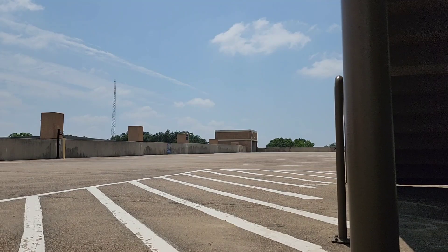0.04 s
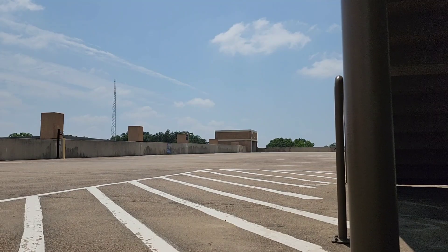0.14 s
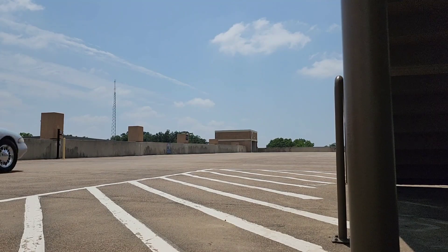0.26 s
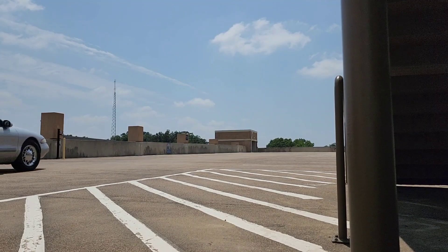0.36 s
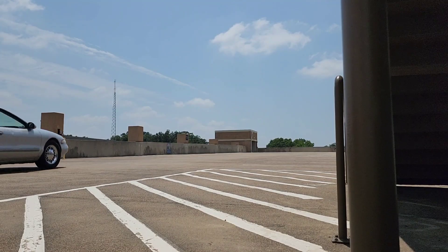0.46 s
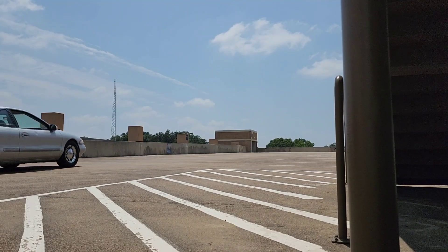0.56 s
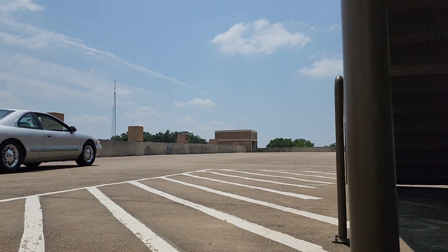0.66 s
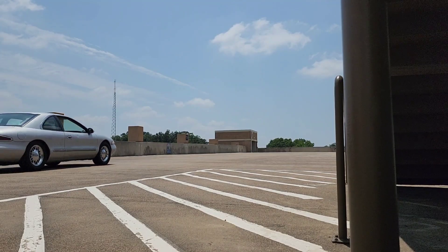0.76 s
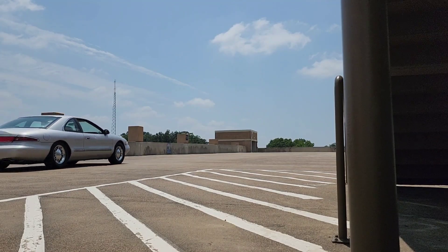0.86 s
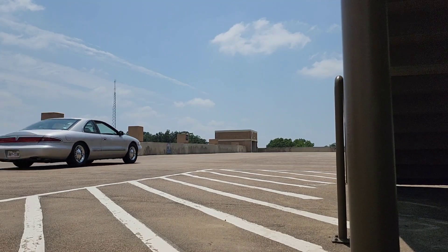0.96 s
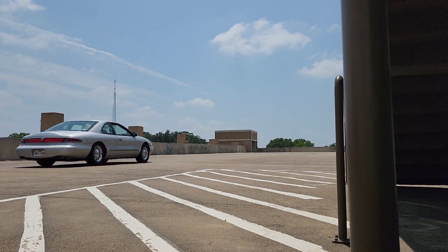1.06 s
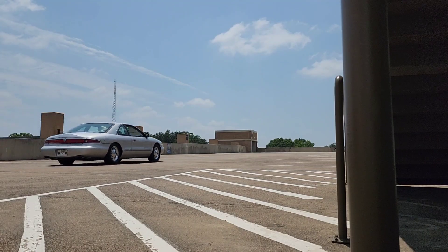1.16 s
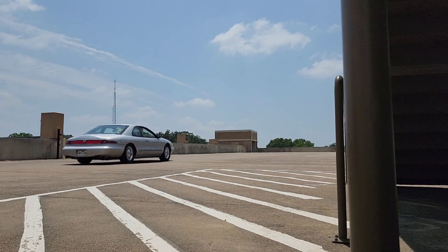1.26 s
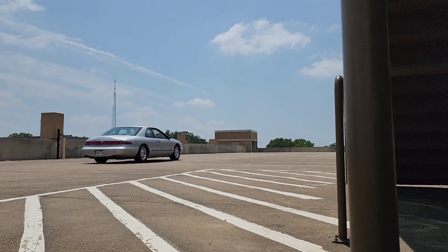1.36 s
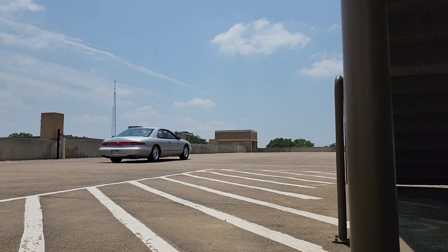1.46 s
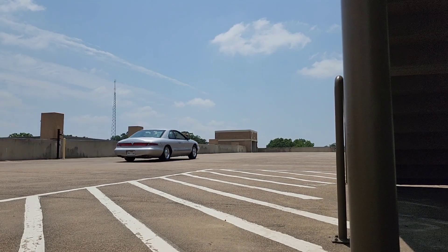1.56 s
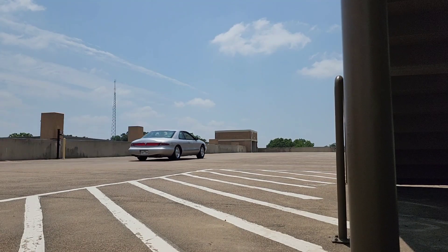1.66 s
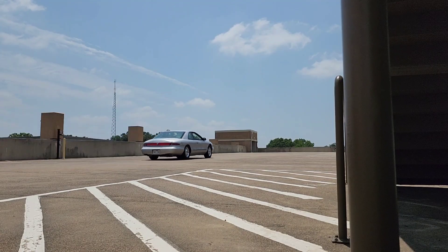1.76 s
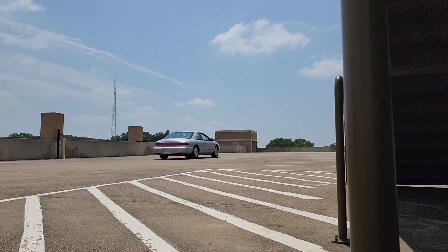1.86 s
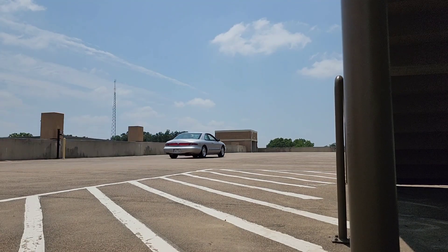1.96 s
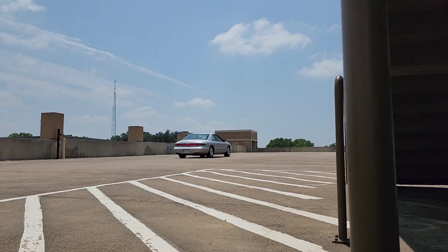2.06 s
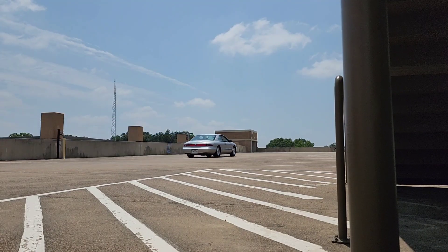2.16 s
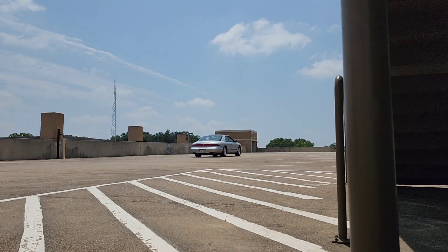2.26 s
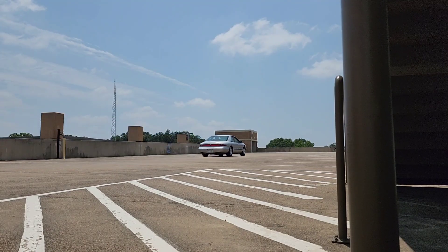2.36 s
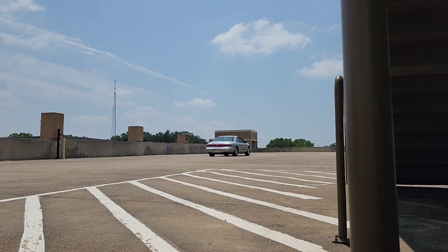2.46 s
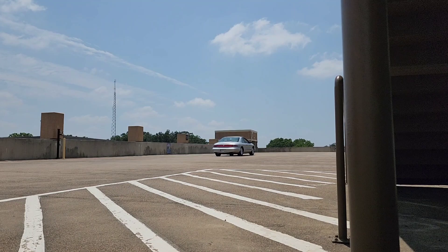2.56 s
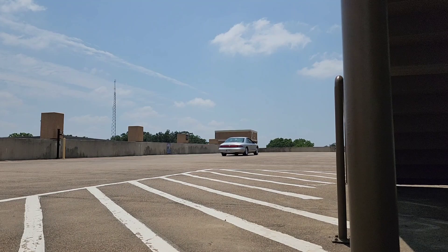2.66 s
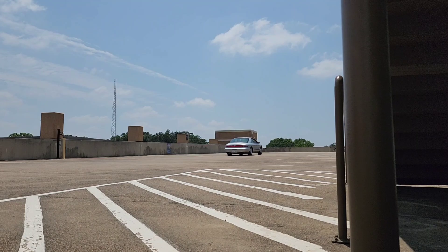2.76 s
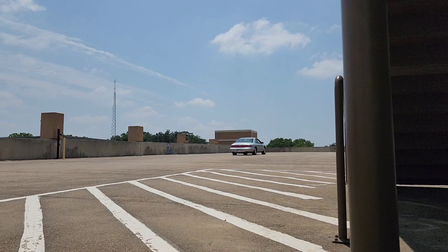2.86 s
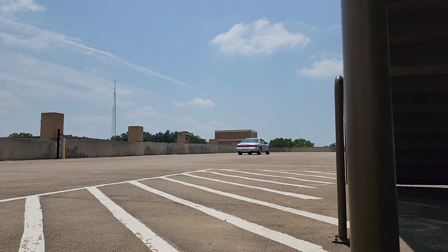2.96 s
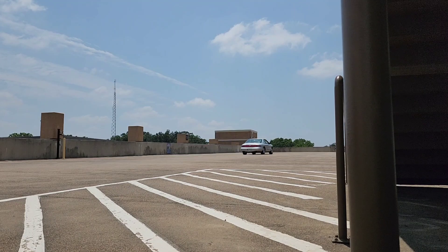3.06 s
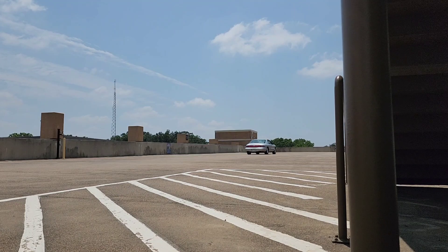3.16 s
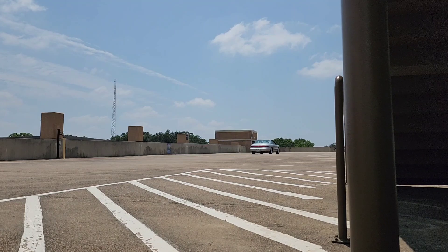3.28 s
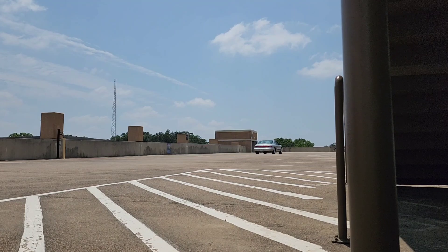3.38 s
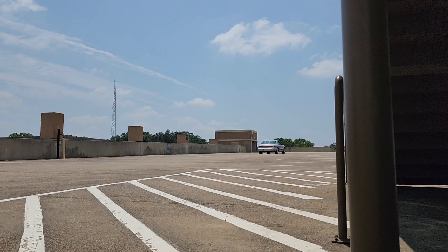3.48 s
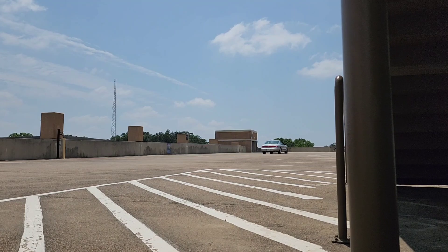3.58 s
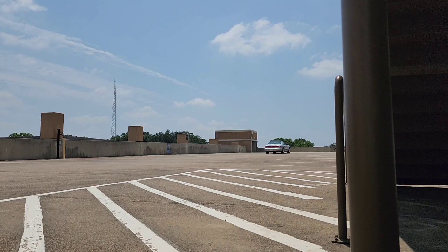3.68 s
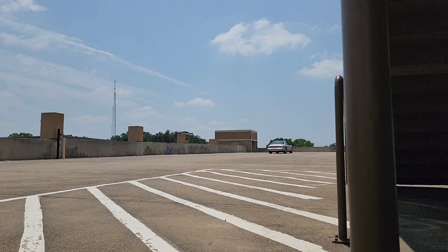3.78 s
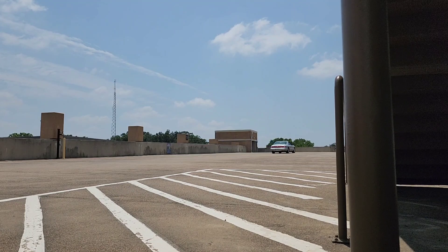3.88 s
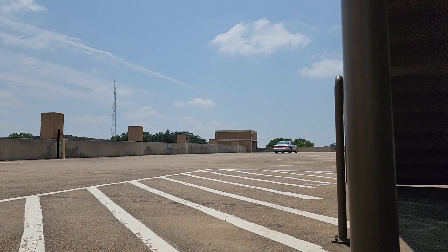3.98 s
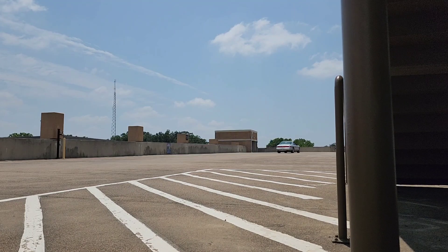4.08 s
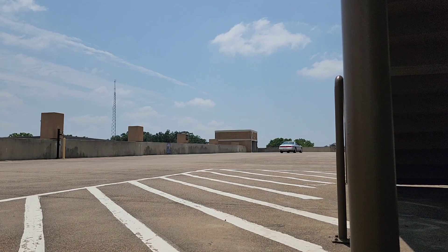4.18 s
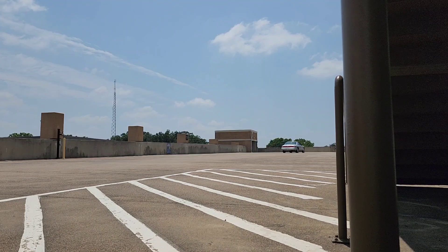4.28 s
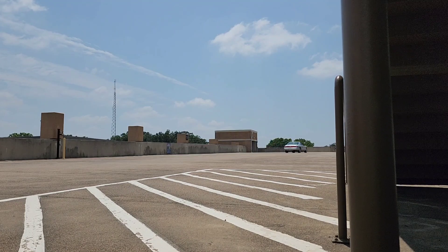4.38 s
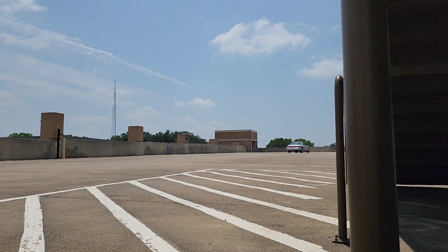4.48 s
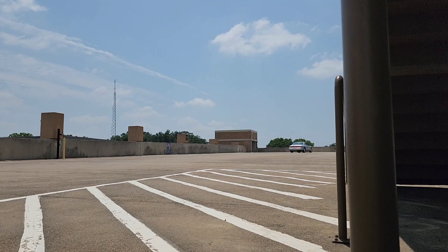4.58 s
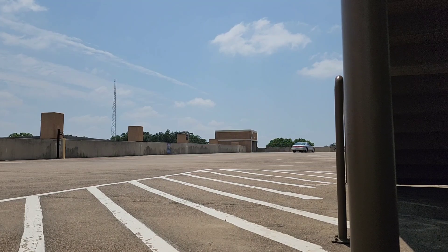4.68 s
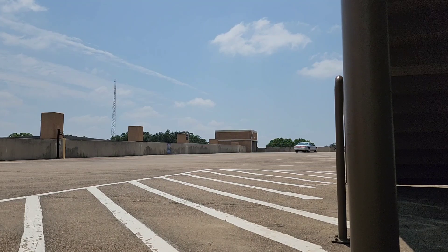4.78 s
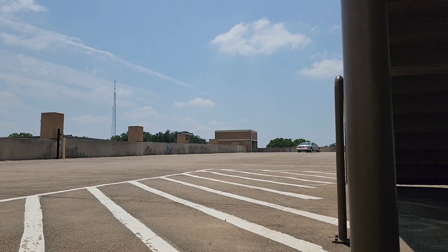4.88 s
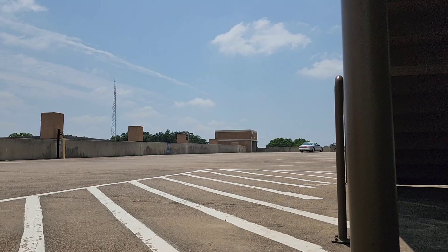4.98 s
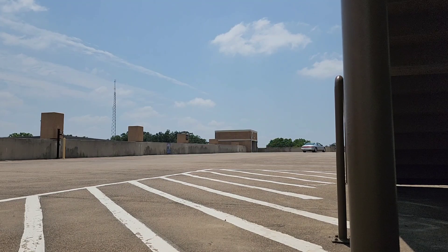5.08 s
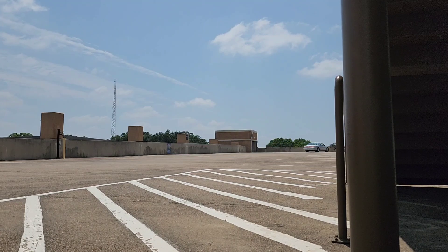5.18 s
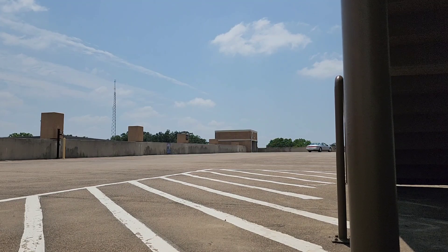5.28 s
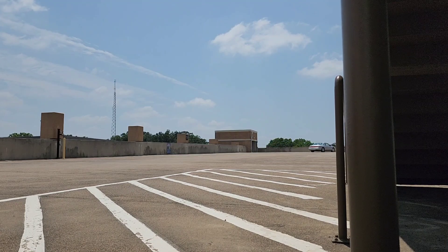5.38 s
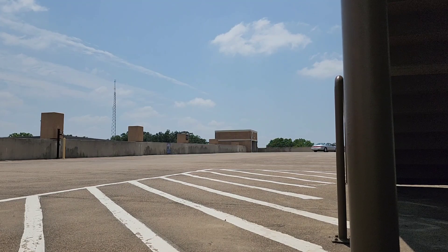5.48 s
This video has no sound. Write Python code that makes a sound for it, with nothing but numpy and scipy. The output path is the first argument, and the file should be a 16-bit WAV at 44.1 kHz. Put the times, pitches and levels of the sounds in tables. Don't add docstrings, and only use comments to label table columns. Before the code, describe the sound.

Outdoors on an open rooftop car park, a large eight-cylinder car accelerates close by, its deep exhaust drone rising with rough barks. At about two seconds the throttle lifts, pitch sinks and the car coasts into the distance. Tyres hiss and low walls echo. Stationary stereo microphones catch wind rumble and buffets, with town hum beneath and a tiny bird at the end.

```python
import sys
import numpy as np
from scipy import signal
from scipy.fft import rfft, irfft, next_fast_len
from scipy.io import wavfile
from scipy.ndimage import uniform_filter1d, map_coordinates

SR = 44100
rng = np.random.default_rng(int(sys.argv[2]) if len(sys.argv) > 2 else 0)


def invert_db(x):
    u = np.asarray(x, float) / 20
    return 10 ** u


def unload_audio(sound):
    columns = np.transpose(np.atleast_2d(sound))
    steps = np.round(np.clip(columns, -1, 1) * 32767)
    wavfile.write(sys.argv[1], SR, steps.astype(np.int16))


N = 243851
TIME = np.arange(N) / SR

# time_s, firing_rate_hz, exhaust_level_db
ENGINE_SPEED = [(0, 135.8, -26.5), (.2, 137.9, -23), (.35, 142, -28), (.6, 152.7, -25.5),
                (.9, 164.7, -23.5), (1.22, 176.5, -19.5), (1.4, 181.3, -23.5), (1.68, 188.9, -25),
                (1.92, 191.7, -25), (2.1, 179.8, -26), (2.3, 173.8, -22.5), (2.6, 154.9, -28),
                (3.0, 146.8, -28.5), (3.15, 133, -34.5), (3.4, 124.1, -37), (3.85, 112.9, -44),
                (4.25, 107.4, -44), (5.53, 100.7, -60.5)]
# time_s, share_off (0-1)
THROTTLE_OFF = [
    (0, 0.03),
    (2, 0.39),
    (2.5, 0.67),
    (5.53, 0.98),
]
# time_s, factor
RAGGEDNESS = [(0, 1.5), (.5, .75), (1.9, .75), (2.4, 1.7), (3.5, 2.5), (5.53, 4)]
FIRINGS_SIDE_ON = [3, 1, -1, -3.5, 3, -1, -1, -2]
FIRINGS_TAIL_ON = [3, 1, -2, -4, -3.5, 3, 1, -1]
# time_s, share_tail_on (0-1)
TURNING = [(0, 0), (.98, 0), (1.08, 1), (5.53, 1)]
# order, best_firing_rate_hz,
# width_hz, level_db, coasting_loss_db
PIPE_ORDERS = [(8, 125.3, 17.3, 8, 3), (8, 168.4, 13.8, 2.5, 12), (8, 185, 9.4, 1.5, -0.5),
               (16, 177.3, 15.8, -4.5, 5), (24, 161, 5, -7, 18), (24, 181, 3.3, -9.5, 4),
               (32, 162.2, 11.6, -1, 28.5), (32, 178, 8.3, -7.5, 4), (4, 182.7, 19, 6, 64),
               (5, 160, 14, -3, 33), (11, 189, 4.8, -10.5, -6.5), (11, 141.7, 8.6, -6, 18),
               (28, 172, 6.9, -7, 17), (46, 173, 4, -10.5, 25), (36, 175, 3.7, -8.5, 9.5),
               (41, 190, 11, -13.5, 25.5), (17, 137.8, 10.7, -22.5, -21.5), (13, 167.4, 6.2, -10, 13),
               (22, 149.7, 4.3, -19, -20.5), (20, 156, 10, -14, 10.5), (26, 240, 9.2, -14, 30.5),
               (30, 171, 3.6, -8.5, 20), (34, 189.6, 4.7, -5, 17), (38, 169, 7.7, -2, 24.5),
               (24, 140, 4.5, -14.5, 27), (40, 140, 2.3, -18.5, 14.5), (24, 190, 5.4, -15, 2.5),
               (21, 161, 4.7, -18, -19.5), (22, 190, 2.3, -16, 21), (34, 150, 6.8, -14, 24),
               (42, 180, 4.4, -6.5, 19), (19, 190, 4.8, -14.5, 2), (16, 162.2, 11, -12.5, 18.5),
               (16, 110, 4.05, -32.5, -24), (44, 175, 2.8, -8.5, 26), (20, 184, 7.4, -13, 4),
               (26, 140, 3.1, -17, 23), (14, 146.3, 8.9, -20.5, -16),
               (40, 120, 5.8, -5, 17), (37, 190, 6, -10, 15), (29, 140, 8.1, -6, 17),
                 (31, 178, 4.7, -9, 35), (35, 180, 3.6, -9.5, 15), (27, 180, 4.7, -12, 7.3),
                 (23, 173, 6.4, -14, 8.5), (9, 154, 20, -12, 3.7), (12, 172.6, 11, -11.5, 18)]
# time_s, half_length_s, level_db
TONE_FADES = [(0.14, 0.011, -36), (0.188, 0.017, -9), (0.206, 0.01, 10), (0.31, 0.045, -16),
              (0.62, 0.06, -6), (0.926, 0.0074, -3), (1.013, 0.16, -2.5), (1.41, 0.037, 3.5),
              (1.59, 0.1, 5), (1.88, 0.083, -1), (2.163, 0.041, -3), (2.241, 0.028, -11),
              (2.374, 0.051, -12), (2.639, 0.042, -5), (2.828, 0.077, -11), (2.991, 0.012, -16),
              (3.09, 0.051, -20), (3.253, 0.021, 4), (3.328, 0.026, -29), (3.56, 0.1, -8), (3.73, 0.072, 1)]
# order, time_s, half_length_s, level_db
OVERTONE_FLARES = [(16, 0.583, 0.024, 11.5), (16, 1.08, 0.12, -4), (16, 1.4, 0.025, 4),
                   (16, 1.4, 0.019, 1.5), (16, 1.417, 0.05, 2.5), (16, 1.534, 0.048, -18),
                   (16, 2.3, 0.021, 3), (16, 2.186, 0.056, -22), (16, 2.41, 0.073, 9), (16, 2.48, 0.1, -3),
                   (24, 1.7, 0.023, 1), (24, 3.5, 0.031, -9), (32, 1.32, 0.026, -14), (32, 2.7, 0.021, 4.5),
                   (32, 1.3, 0.083, -6.5), (32, 2.28, 0.086, -0.5), (16, 4.1, 0.053, 11),
                   (16, 4.28, 0.025, 4), (16, 8.1, .03, 9)]
PORT_SPLIT = [(4, .2), (8, 0), (16, 0.13), (24, 0.28), (32, 0.073), (46, 0)]
# pitch_hz, width_hz, pulling_level_db, coasting_level_db
TAIL_PIPE = [(139.3, 22, 6, -5), (227, 115, 1.5, 11.5), (394, 84, -4, 10), (585, 132, 3, 3.5),
             (700, 50, 4, -7), (780, 21, -14.5, -12), (1040, 170, -39.5, -26)]
# time_s, peak_level_db, ring_hz
HARD_FIRINGS = [(0.067, -23, 554), (0.104, -20, 700), (0.166, -23, 656), (0.216, -24, 694),
                (0.237, -25, 670), (0.341, -8, 704), (0.45, -12, 620), (0.506, -10.5, 650),
                (0.647, -14, 759), (0.748, -9, 479), (0.798, -22, 735), (0.822, -16, 620),
                (0.848, -18, 710), (0.872, -12, 654), (0.921, -17, 656), (0.945, -22, 690),
                (0.969, -17, 696), (1.138, -21, 670), (1.157, -15.5, 730), (1.185, -9, 670),
                (1.23, -16, 720), (1.487, -14, 620), (1.695, -15.5, 780), (1.837, -20, 563.9),
                (1.904, -9.5, 573), (2.005, -20.5, 713), (2.069, -26, 740), (2.137, -7, 733),
                (2.181, -30.5, 710), (2.227, -16, 770), (2.245, -11, 700), (2.273, -14, 673),
                (2.366, -27.5, 713), (2.494, -26, 630.7), (2.615, -24, 540), (2.638, -21.5, 743),
                (2.707, -19, 670), (2.768, -32, 780), (2.854, -12, 732), (2.873, -27, 697),
                (2.927, -31, 459.5), (2.972, -28, 660), (3.001, -20, 764), (3.059, -31, 582.2),
                (3.092, -28, 743), (3.114, -22, 641), (3.153, -15, 670), (3.176, -28, 750),
                (3.239, -28, 664), (3.304, -15, 710), (3.371, -29, 740), (3.396, -21, 665),
                (3.47, -23, 514), (3.572, -21, 519.6)]
CREST, VALVE = .33, .15

# time_s, distance_m
CAR_DISTANCE = [(0, 6.9), (.5, 7), (1.1, 6.8), (1.7, 10.6), (2.4, 11.9), (2.8, 23), (3.6, 31.5), (5.53, 67)]
# pitch_hz, level_db_per_hz
WHIRR_TONE = [(530, -45.5), (900, -1.5), (982, -5.5), (1070, -4.5), (1170, -11.5), (1340, -6.5),
              (1660, -10), (1830, -8.5), (2050, -11), (2220, -16), (2410, -11.5), (2680, -16),
              (3280, -21.5), (3650, -21.5), (4500, -27.5), (5850, -55.5), (9900, -120)]
# pitch_hz, level_db_per_hz
HISS_TONE = [(2060, -13.5), (3500, -2), (5010, -5.5), (6240, -4.5), (6940, -5.5), (8220, -6), (9930, -17),
             (12100, -17), (14300, -17.5), (14900, -14), (15700, -39.5)]
# pitch_hz, share
CAR_LIKENESS = [(900, 0.83), (2000, 0.31), (4000, 0.14), (9000, 0.078)]
# time_s, half_length_s, level_db
TYRE_SCRUB = [
    (0.212, 0.06, -39.5),
    (0.417, 0.085, -45),
    (1.207, 0.36, -46),
]
# pitch_hz, level_db_per_hz
TREAD_TONE = [(1000, -120), (1600, -49), (1800, 0), (1920, -13), (2060, -5), (2300, -44), (3500, -120)]
# time_s, half_length_s, level_db
TYRE_ROAR = [
    (2.875, 0.24, -46.5),
    (3.6, 0.38, -51.5),
    (4.2, 0.34, -53.5),
]
# pitch_hz, level_db_per_hz
ROAR_TONE = [(300, -40), (550, -4), (800, 1), (1200, -4), (1600, -15.5), (2200, -30), (4000, -79)]
# time_s, level_db, low_hz, high_hz
STONES = [
    (.3365, -26, 4200, 6800),
    (.847, -37, 2900, 14400),
    (.859, -39, 2900, 14400),
]
# time_s, half_length_s, level_db
BODY_BOOMS = [
    (0.7, 0.26, -24.5),
    (1.14, 0.13, -29),
    (1.617, 0.17, -34.5),
]
# pitch_hz, level_db_per_hz
BODY_TONE = [(20, -88.5), (45, -38), (70, 2), (92, -0.5), (110, -1), (150, -32), (250, -120)]

# time_s, exhaust_lag_samples (right after left), gear_lag_samples, wall_echo_db
CAR_BEARING = [(0, 21, 15, -25.5), (.5, 13.5, 12.4, -15), (1.3, 8.5, 12.8, -8.5), (1.9, 8, 13.7, -8),
               (3, -12.5, 12.3, -11.5), (5.53, -9, 10.6, -19)]
# pitch_hz, level_db
ECHO_TONE = [(100, 3), (250, -7), (450, -3.5), (900, 0.5), (2000, 18.5), (8000, -21)]
# pitch_hz, decay_s
ECHO_DECAY = [(200, 0.82), (1000, 0.9), (8000, 0.33)]
# pitch_hz, level_db
STEREO_LEAN = [(100, -1), (700, 1.5), (1400, -1.5), (5000, -1), (9000, -7.5), (15000, -5.5)]

# time_s, half_length_s, level_db, left_right_db
WIND_GUSTS = [(.05, 0.07, -31, 3), (.23, 0.052, -22.5, 5), (.35, 0.053, -28, 5), (.96, 0.018, -31, 2),
              (1.21, 0.094, -22, 1), (1.62, 0.016, -35, -6), (2.85, 0.21, -41.5, -2),
              (3.14, 0.016, -29, -3), (4.02, 0.074, -43, -2), (4.3, 0.19, -52, 2), (5.26, 0.018, -38, 2),
              (5.42, 0.076, -46, -1)]
# time_s, half_length_s, level_db, left_right_db
WIND_BUFFETS = [
    (0.2, 0.044, -25, -16),
    (1.16, 0.021, -18.5, 3),
    (1.2, .02, -25, 4),
    (1.24, 0.034, -18.5, 5.5),
]
# time_s, half_length_s, level_db
WIND_LULLS = [
    (0.433, 0.033, -18.5),
    (2.08, 0.13, -12),
    (3.283, 0.091, -9),
]
# pitch_hz, level_db_per_hz
RUMBLE_TONE = [(12, -27), (20, -9.5), (70, -9), (91, -14), (108, -18.5), (130, -21.5), (170, -54),
               (290, -120)]
# pitch_hz, level_db_per_hz
BUFFET_TONE = [(20, -6), (45, -20), (120, 13), (250, -0.5), (700, -9), (1500, -23), (4000, -120)]
# start_s, length_s, start_hz, end_hz, level_db
BIRD_NOTES = [(5.084, 0.0073, 6580, 6100, -58), (5.086, .01, 6100, 5130, -63),
              (5.136, 0.015, 6540, 5190, -53), (5.15, 0.0071, 5100, 4530, -66),
              (5.206, 0.015, 5750, 5350, -65), (5.25, .01, 4630, 4300, -72),
              (5.302, 0.025, 5790, 5250, -67), (5.317, 0.014, 4800, 4580, -67),
              (5.349, 0.012, 5620, 6050, -62), (5.361, 0.016, 5750, 5300, -65),
              (5.372, .01, 5250, 4670, -67), (5.455, .012, 8000, 7200, -71),
              (5.465, 0.012, 6600, 5970, -71)]
# pitch_hz, level_db_per_hz
TOWN_TONE = [(53, -35), (90, 5.5), (134, -9.5), (172, -7), (343, -16.5), (393, -20.5), (432, -18.5),
             (554, -22.5), (860, -24.5), (1780, -28.5), (2200, -39), (4370, -39.5), (8700, -59.5),
             (11300, -81), (19100, -120)]
# pitch_hz, share
TOWN_LIKENESS = [(60, 1), (180, 1), (550, 1), (1650, 0.41), (4970, 0), (15000, 0.33)]
# pitch_hz, level_db_per_hz
INSECT_TONE = [(3700, -33), (4200, 1.0), (4400, -3.5), (4650, -12), (5200, -42.5), (8600, -39.0), (9100, -99)]
# pitch_hz, level_db_per_hz
CIRCUIT_TONE = [(10000, -36), (10600, -1.5), (14700, -3.0), (15600, -1), (16000, -38.5)]


def unit(x):
    return x / np.sqrt(np.mean(x ** 2) + 1e-20)


def along(points, hz):
    f, v = np.transpose(points)
    return np.interp(np.log(hz + 1), np.log(f + 1), v)


def curves(rows):
    s, *cols = np.transpose(rows)
    return [np.interp(TIME, s, c) for c in cols]


def wobble(rate):
    coarse = TIME[::64]
    knots = rng.standard_normal(int(N * rate / SR) + 4)
    return np.interp(TIME, coarse, map_coordinates(knots, [coarse * rate]))


def bump(s, half):
    return np.exp(-np.square(np.square((TIME - s) / half)))


def swelling(rows):
    return sum(invert_db(db) * bump(s, half) for s, half, db in rows)


def filtered(x, response):
    m = next_fast_len(N + 8192)
    return irfft(rfft(x, m) * response(np.fft.rfftfreq(m, 1 / SR)), m)[..., :N]


def rush(spectrum, alike):
    def shape(hz):
        turn = np.arccos(np.clip(along(alike, hz), -1, 1)) / 2
        return invert_db(along(spectrum, hz)) * [np.cos(turn), np.sin(turn)]

    mid, side = filtered(rng.standard_normal((2, N)), shape)
    return unit(np.array([mid + side, mid - side]))


def engine():
    rate, exhaust_db = curves(ENGINE_SPEED)
    rate = uniform_filter1d(rate, int(.1 * SR), mode="nearest")
    fired = np.cumsum(rate) / SR
    (lift,), (rough,), (tail_on,) = curves(THROTTLE_OFF), curves(RAGGEDNESS), curves(TURNING)
    hard = crests(fired)
    surge = surges(hard)
    drone = exhaust_drone(rate, fired, lift, rough, tail_on, surge) * invert_db(exhaust_db + 0.5)
    bark = exhaust_bark(fired, lift, rough, tail_on) * invert_db(exhaust_db - 4.5 + 1.2 * wobble(18))
    return drone, surge * bark + pops(hard)


def exhaust_drone(rate, fired, lift, rough, tail_on, surge):
    rings = PIPE_ORDERS
    fading = invert_db(sum(db * bump(s, half) for s, half, db in TONE_FADES))
    alive = np.clip((4.05 - TIME) / 0.09, 0, 1)

    def ring(order):
        level = 0
        for n, best_hz, width_hz, db, lost_db in rings:
            if round(n) == order:
                nearness = np.exp(-((rate - best_hz) / width_hz) ** 2)
                level = level + invert_db(db - lost_db * lift) * (invert_db(-16.5) + nearness)
        return level

    def flare(order):
        return invert_db(sum(db * bump(s, half) for n, s, half, db in OVERTONE_FLARES if round(n) == order))

    def tone(k):
        side_on, behind = firing_order(FIRINGS_SIDE_ON, k), firing_order(FIRINGS_TAIL_ON, k)
        start = np.angle(side_on) + tail_on * np.angle(behind / side_on)
        blur = .12 * k ** 1.4 * rough ** 2 * wobble(24)
        apart = (along(PORT_SPLIT, 8 * k) + .03 * k * wobble(4)) * [[1], [-1]]
        flutter = invert_db((1.2 + .3 * k) * wobble(14) + 1.3 * wobble(35))
        return flutter * np.cos(2 * np.pi * k * fired + blur + start + apart)

    drone = 0
    for n in sorted({round(row[0]) for row in rings}):
        if n == 8:
            change = fading * alive
        else:
            change = flare(n) * (surge if n > 20 else 1)
        drone = drone + ring(n) * tone(n / 8) * change
    return drone


def firing_order(pattern, k):
    linger = .045 * max(k - 2, 0) ** 2
    return invert_db(pattern) @ np.exp(-2j * np.pi * k * (np.arange(8) + CREST) - 2j * np.pi * linger)


def exhaust_bark(fired, lift, rough, tail_on):
    at = np.flatnonzero(np.diff(np.floor(fired - VALVE)) > 0)
    cylinder = np.arange(len(at)) % 8
    drift = np.array([wobble(2) for _ in range(8)])[cylinder, at]
    chance = rng.standard_normal((len(at), 2))
    shift = np.round(3 * rough[at] * chance[:, 0] + 6 * drift).astype(int)
    late = np.clip(at + shift, 0, N - 1)
    side_on, behind = np.array(FIRINGS_SIDE_ON)[cylinder], np.array(FIRINGS_TAIL_ON)[cylinder]
    size = invert_db(np.where(tail_on[at] > .5, behind, side_on) + 1.5 * drift + 1.2 * chance[:, 1])
    puffs = np.zeros(N)
    puffs[late] = size - 0.78 * size.mean()
    gate = 1 + .5 * np.sin(2 * np.pi * fired)
    gas = unit(puffs) + .75 * rough * gate * rng.standard_normal(N)
    gas = gas / np.sqrt(1 + (.75 * rough) ** 2)

    def pipe_and_silencer(f):
        pipe = sum(invert_db([[load_db], [lift_db]]) * 1j * f * w / (c * c - f * f + 1j * f * w)
                   for c, w, load_db, lift_db in TAIL_PIPE)
        return pipe / (1 + (1j * f / 1050) ** 2 + 1.2j * f / 1050) ** 3

    pulling, coasting = filtered(gas, pipe_and_silencer)
    return (1 - lift) * unit(pulling) + lift * unit(coasting)


LEAD_S = .0012


def crests(fired):
    near = np.interp(np.transpose(HARD_FIRINGS)[0] + LEAD_S, TIME, fired)
    return np.searchsorted(fired, np.round(near - CREST) + CREST)


def surges(at):
    t, marks = np.arange(-800, 801) / SR, np.bincount(at, minlength=N)
    hush_s = surge_s = .004
    hush_db = -6 * np.exp(-((t + 1.6 * hush_s) / hush_s) ** 2)
    surge_db = .5 * np.exp(-(t / surge_s) ** 2)
    return invert_db(signal.fftconvolve(marks, hush_db + surge_db, "same"))


def pops(at):
    out, t = np.zeros(N), np.arange(SR // 10) / SR
    t60_s, attack_s = .034, .0016
    for i, (s, db, hz) in zip(at, HARD_FIRINGS):
        swell = invert_db(db - 8.5 - 60 * t / t60_s) * (1 - np.exp(-t / attack_s))
        out[i - round(LEAD_S * SR):][:len(t)] += swell * np.cos(2 * np.pi * hz * (t - LEAD_S))
    return out


def running_gear():
    (metres,), (lift,) = curves(CAR_DISTANCE), curves(THROTTLE_OFF)
    near_m = 7.76
    beyond = metres - near_m
    whirr = invert_db(-37 - 2 * lift + 0.89 * wobble(21.12)) * rush(WHIRR_TONE, CAR_LIKENESS)
    hiss_db = -52.5 + 7 - 14 * lift + 0.67 * wobble(9.44) + 0.43 * wobble(25)
    hiss = invert_db(hiss_db) * rush(HISS_TONE, CAR_LIKENESS)

    def fade(x, edge_hz, change_db):
        return x - (1 - invert_db(change_db)) * filtered(x, lambda hz: 1 / (1 + (edge_hz / (hz + 1)) ** 40))

    whirr = fade(whirr, 2390, -0.31 * beyond)
    hiss = fade(hiss, 8650, -18.5 * np.tanh(beyond / 35))
    scrub = swelling(TYRE_SCRUB) * rush(TREAD_TONE, CAR_LIKENESS)
    roar = swelling(TYRE_ROAR) * invert_db(3.2 * wobble(30)) * rush(ROAR_TONE, CAR_LIKENESS)
    return near_m / metres * (whirr + hiss) + scrub + roar


def body():
    return swelling(BODY_BOOMS) * rush(BODY_TONE, [(30, 0.85)])


def grit():
    out, t = np.zeros(N), np.arange(900) / SR
    for s, db, low_hz, high_hz in STONES:
        crack = rng.standard_normal(len(t)) * invert_db(db - 60 * t / .02)
        band = signal.butter(2, [low_hz, high_hz], "band", fs=SR)
        out[round(s * SR):][:len(t)] += signal.lfilter(*band, crack)
    return out


def ports(pair, lag):
    n, (left, right) = np.arange(N), np.broadcast_to(pair, (2, N))
    return np.array([map_coordinates(x, [n + lead], mode="mirror")
                     for x, lead in [(left, lag / 2), (right, -lag / 2)]])


def deck(x, size=16384):
    out, x = np.zeros((2, N + 3 * SR)), np.pad(x, (size // 2, size))
    for start in range(0, N + size // 2, size // 2):
        hz, t, z = signal.stft(rng.standard_normal((2, SR // 3)), SR, nperseg=256)
        decay_db = along(ECHO_TONE, hz)[:, None] - 60 * t / along(ECHO_DECAY, hz)[:, None]
        tail = signal.istft(z * invert_db(decay_db), SR, nperseg=256)[1]
        piece = x[start:start + size] * np.sqrt(np.hanning(size))
        answer = signal.fftconvolve(piece[None], tail, axes=1)
        out[:, start:start + answer.shape[1]] += answer
    return invert_db(-34.5) * out[:, size // 2:][:, :N]


def wind():
    side = np.array([[.5], [-.5]])

    def swells(rows):
        return sum(invert_db(db + side * lean_db) * bump(s, half) for s, half, db, lean_db in rows)

    lull_db = sum(db * bump(s, half) for s, half, db in WIND_LULLS)
    breeze = invert_db(-40.5 + 0.94 * wobble(5.2) + lull_db)
    rumble = (breeze + swells(WIND_GUSTS)) * rush(RUMBLE_TONE, [(30, .72), (120, .75)])
    lumps = invert_db(1.5 * np.array([wobble(24), wobble(35)]))
    return rumble + swells(WIND_BUFFETS) * unit(lumps * rush(BUFFET_TONE, [(30, 0.26)]))


def bird():
    out = np.zeros(N)
    for s, length, start_hz, end_hz, db in BIRD_NOTES:
        n = round(length * SR)
        phase = 2 * np.pi * np.cumsum(np.linspace(start_hz, end_hz, n)) / SR
        out[round(s * SR):][:n] += invert_db(db) * np.hanning(n) * np.sin(phase)
    t = np.arange(SR // 5) / SR
    tail = rng.standard_normal((2, len(t))) * invert_db(-60 * t / .15)
    echo = signal.fftconvolve(out[None], tail / np.linalg.norm(tail[0]), axes=1)[:, :N]
    return out * invert_db([[1], [-1]]) + invert_db(-5) * echo


def town():
    insects = invert_db(-73.0 + 1.6 * wobble(40)) * rush(INSECT_TONE, [(30, .1)])
    circuit = invert_db(-93.5) * rush(CIRCUIT_TONE, [(30, 0.0051)])
    hum = filtered(rush(TOWN_TONE, TOWN_LIKENESS), lambda hz: 1 / (1 + (hz / 8700) ** 60))
    return invert_db(-43 + 0.43 * wobble(2.0)) * hum + insects + circuit


def scene():
    drone, bark = engine()
    gear = running_gear()
    lag, gear_lag, wall_db = curves(CAR_BEARING)
    late = np.pad(bark + gear, ((0, 0), (700, 0)))[:, :N]
    wall = invert_db(wall_db) * ports(late, -22.0)
    wall = filtered(wall, lambda hz: hz ** 2 / (hz ** 2 + 600 ** 2))
    echoes = deck(bark + invert_db(-10.5) * drone[0])
    car = ports(drone + bark, lag) + ports(gear, gear_lag) + wall + echoes
    car = filtered(car, lambda hz: invert_db(along(STEREO_LEAN, hz) * [[.5], [-.5]]))
    return car + body() + grit() + wind() + bird() + town()


def roll_off(x):
    return signal.sosfilt(signal.butter(12, 15500, fs=SR, output="sos"), x)


def record(dry):
    x = filtered(dry, lambda hz: hz ** 2 / (hz ** 2 + 28 ** 2))
    top, knee = .88, 5
    x = x / (1 + np.abs(x / top) ** knee) ** (1 / knee)
    return roll_off(x)


dry = scene()
out = record(dry)
unload_audio(out)
```